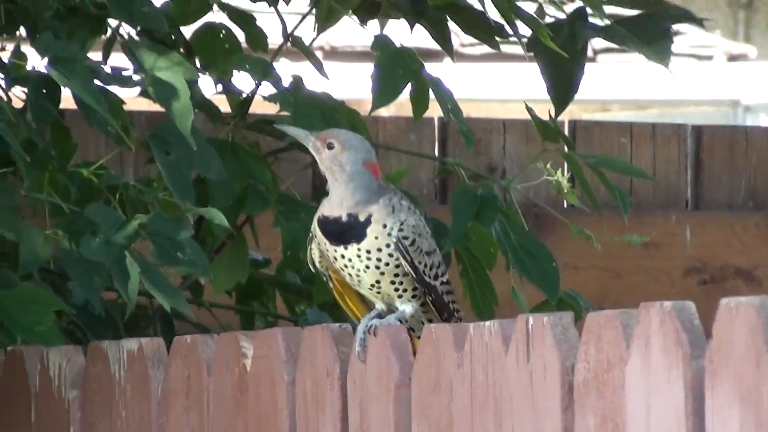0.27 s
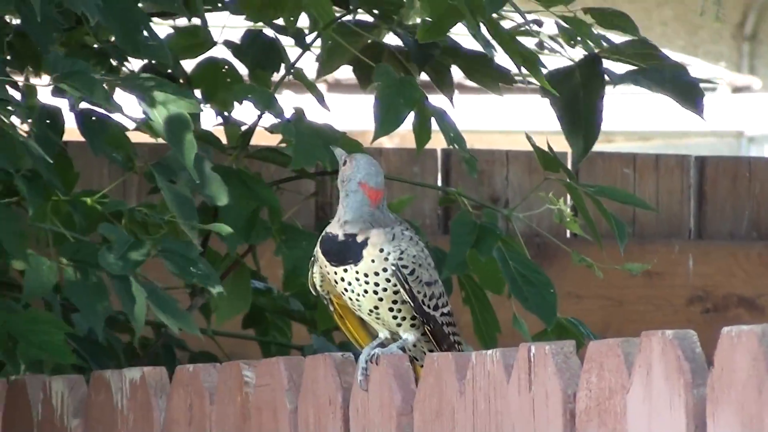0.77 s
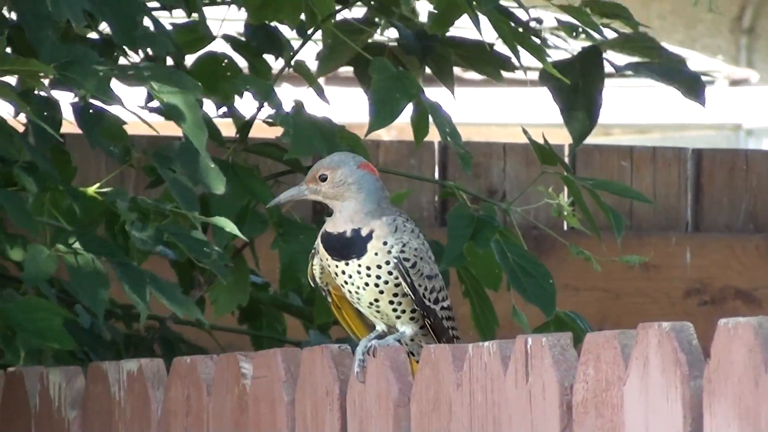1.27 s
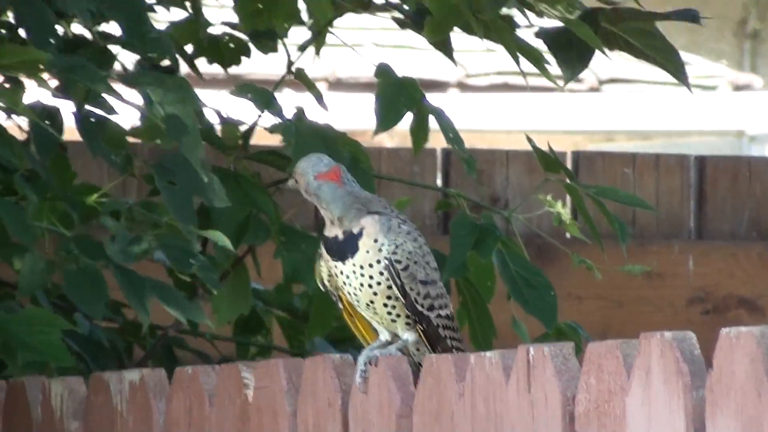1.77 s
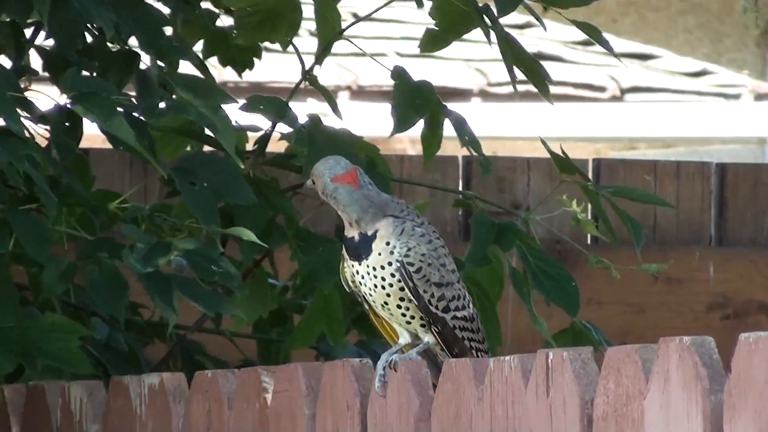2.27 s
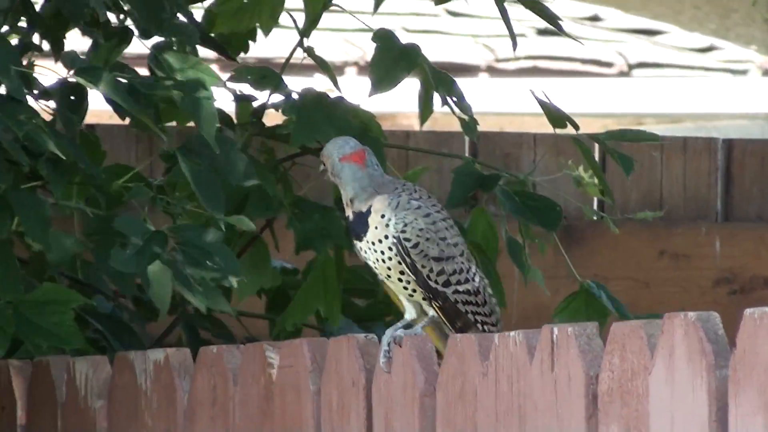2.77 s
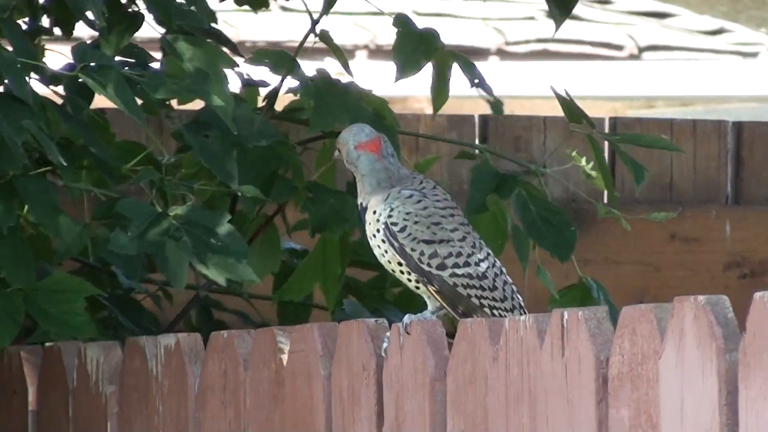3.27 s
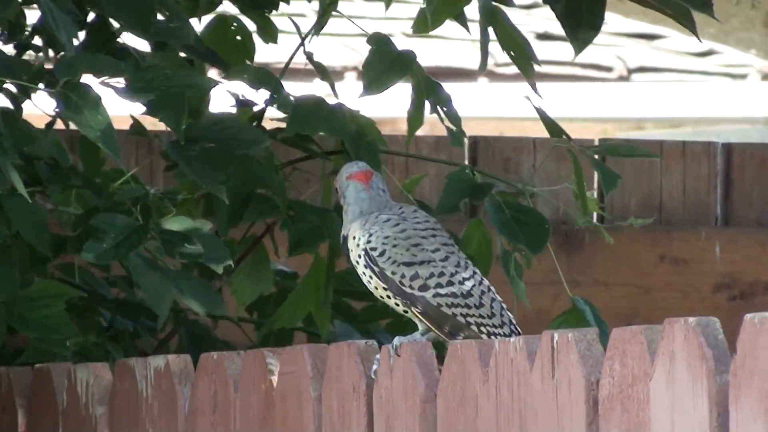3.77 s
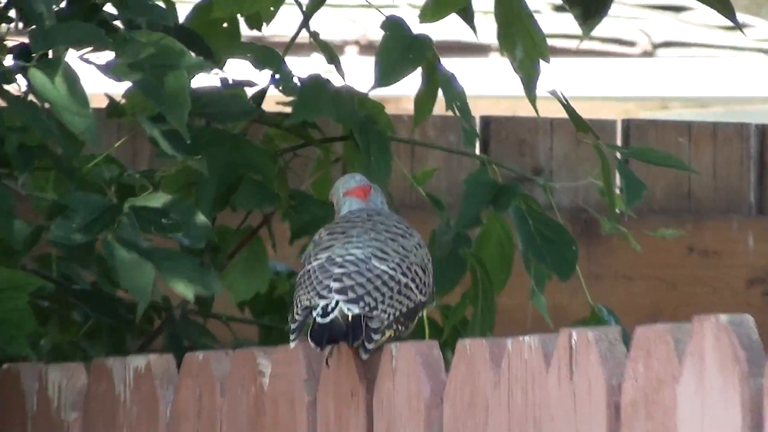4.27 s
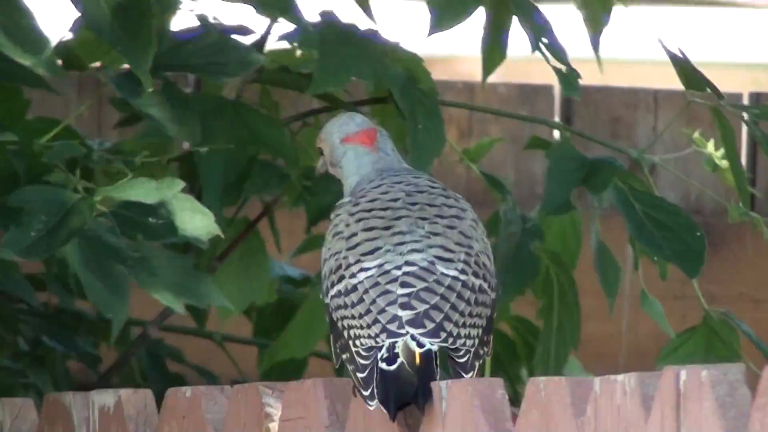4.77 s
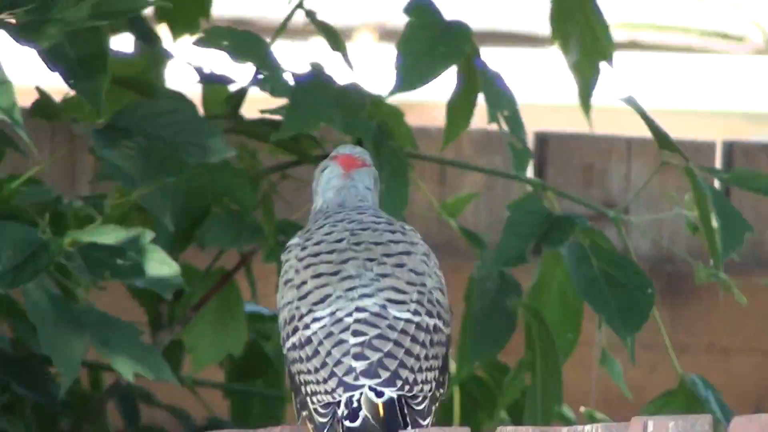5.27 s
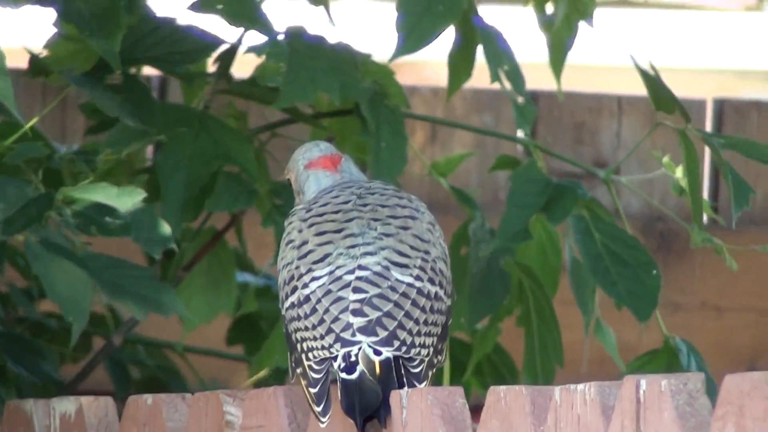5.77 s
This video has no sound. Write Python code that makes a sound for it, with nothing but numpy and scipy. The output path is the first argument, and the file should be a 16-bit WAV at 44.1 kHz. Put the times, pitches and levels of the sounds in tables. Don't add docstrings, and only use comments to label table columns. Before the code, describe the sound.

Two sharp, down-sliding woodpecker cries ring across a yard, between them a hard plastic click, faint chirps, and a distant engine pulling away.

```python
import sys
import numpy as np
from scipy import signal
from scipy.fft import rfft, irfft
from scipy.io import wavfile
from scipy.ndimage import uniform_filter1d, map_coordinates

SR = 44100
rng = np.random.default_rng(int(sys.argv[2]) if len(sys.argv) > 2 else 0)


def wav_record(signal):
    frames = np.transpose(np.atleast_2d(signal))
    bounded = np.clip(frames, -1, 1)
    quanta = np.round(bounded * 32767).astype(np.int16)
    wavfile.write(sys.argv[1], SR, quanta)


def makeup_ratio(level_db):
    decades = np.asarray(level_db, float) / 20
    return 10 ** decades


N = 266187
T = np.arange(N) / SR
# (frequency [Hz], likeness [0 to 1])
ALIKE = [(60, 0.99), (150, 1), (380, 0.897), (950, 0.78), (2380, 0.46), (5980, 0.696), (15000, 0.87)]


def unit(x):
    return x / np.sqrt(np.mean(x ** 2) + 1e-20)


def along(points, hz):
    f, v = np.transpose(points)
    return np.interp(np.log(hz + 1), np.log(f + 1), v)


def wobble(rate, count=N):
    knots = rng.standard_normal(int(count * rate / SR) + 4)
    return map_coordinates(knots, [np.arange(count) * rate / SR])


def glide(u, a, b, c):
    return a * (1 - u) * (1 - 2 * u) + 4 * b * u * (1 - u) + c * u * (2 * u - 1)


def rush(spectrum, alike, patchy_db):
    hz, _, z = signal.stft(rng.standard_normal((2, N)), SR, nperseg=2048)
    field = uniform_filter1d(rng.standard_normal(z.shape[1:]), size=12, axis=0)
    field = uniform_filter1d(field, size=4, axis=1)
    turn = np.arccos(np.clip(along(alike, hz), -1, 1)) / 2
    colour = makeup_ratio(along(spectrum, hz)) * [np.cos(turn), np.sin(turn)]
    z = z * makeup_ratio(patchy_db * unit(field)) * colour[..., None]
    mid, side = signal.istft(z, nperseg=2048)[1][:, :N]
    return unit(np.array([mid + side, mid - side]))


def notes(fall, level_db, factor, stretch):
    # (length [s], start [Hz], middle [Hz], end [Hz], level over the call [dB])
    opening = [
        (.0065, 3030, 3118, 3148, -2),
        (.0165, 2010, 1622, 2232, -3.5),
        (.033, 1670, 1585, 1500, 1.5),
    ]
    lengths = [stretch * row[0] for row in opening]
    rows = []
    for k, (_, a, b, c, db) in enumerate(opening):
        start = fall[0][0] - sum(lengths[k:])
        rows.append((start, factor * a, factor * b, factor * c, level_db + db))
    for (s, hz, db), (_, end, _) in zip(fall, fall[1:] + fall[-1:]):
        rows.append((s, hz, (hz + end) / 2, end, db))
    return rows


def woodpecker(rows, smear):
    # (frequency [Hz], width [Hz], level [dB])
    resonances = [(1884, 4300, -6), (3200, 1700, -1.5), (5080, 2100, -3.5), (6500, 2200, -3.5),
                  (9090, 890, 1.5), (10940, 700, -20.5), (12600, 1500, -20), (14600, 1500, -22)]
    # (fundamental [dB], third partial [dB], higher partials [dB], rasp [dB])
    voicing = [
        (-6.5, -40, -29, -42),
        (-1.5, -7, -14, -18),
        (-30, -25, -22, -27),
        (0, -12, -13, -32.5),
        (-8.5, -15.5, -7.5, -27),
        (-10.5, -12, -17, -19),
        (-15, -14, -15.5, -30),
        (-6, -4, -20.5, -26),
        (-4, -24.5, -29, -40),
    ]
    # (frequency [Hz], level per Hz [dB])
    air = [(1200, -36), (2500, -20), (5000, -9), (7700, 0.5), (9250, -3), (10600, -10), (13000, -13),
           (15500, -18)]

    def throat(hz):
        return np.sqrt(sum(makeup_ratio(2 * db) / (1 + (2 * (hz - f) / w) ** 2) ** 2 for f, w, db in resonances))

    s, a, b, c, level_db = np.transpose(rows)
    t = T[round(s[0] * SR):round(s[-1] * SR)]
    count = len(t)
    i = np.clip(np.searchsorted(s, t, "right") - 1, 0, len(s) - 2)
    colour = np.transpose(voicing)[:, i].astype(float)
    first_db, third_db, high_db, rasp_db = uniform_filter1d(colour, size=90, axis=1)
    pitch = glide((t - s[i]) / np.diff(s)[i], a[i], b[i], c[i])
    phase = 2 * np.pi * np.cumsum(pitch * (1 + 0.005 * wobble(389.0, count=count))) / SR

    voice = np.zeros(count)
    second_db = np.where(i, 0, -14)
    for k, weight_db in enumerate([first_db, second_db, third_db] + [high_db] * 11, 1):
        flutter = (1.9 + min(k, 5) * 0.35) * wobble(230.4, count=count)
        fade = 2.8 * max(k - 6, 0)
        blur = max(k - 2, 0) * smear * wobble(600, count=count)
        strength = throat(k * pitch) * makeup_ratio(weight_db + flutter - fade) * (k * pitch < SR / 2.5)
        voice += strength * np.sin(k * phase + blur)

    puffs = rng.standard_normal(count) * (1 + np.sin(phase))
    air_gain = makeup_ratio(along(air, np.fft.rfftfreq(count, 1 / SR)))
    rasp = unit(irfft(rfft(puffs) * air_gain, count))
    scoop_jump = np.exp(-((t - s[2] - .001) / 0.0084) ** 2)
    rasp_db = uniform_filter1d(rasp_db, size=700) + 11 * scoop_jump

    centres = np.r_[s[0], (s[:-1] + s[1:]) / 2, s[-1]]
    effort = makeup_ratio(np.interp(t, centres, np.r_[level_db[0] - 8, level_db]))
    breaks = 1 - 0.3 * np.exp(-((t[:, None] - s[1:4]) / 0.001) ** 2).sum(axis=1)
    edge = np.clip(np.minimum(t - s[0], s[-1] - t) / 0.00067, 0, 1)
    out = np.zeros(N)
    out[round(s[0] * SR):][:count] = (voice * breaks + makeup_ratio(rasp_db) * rasp) * effort * edge
    return out


def yard(x, wet_db, delay):
    # (frequency [Hz], time to fall 60 dB [s])
    decay = [(800, 0.63), (2000, 0.47), (3100, 0.5), (4500, 0.52), (8000, 0.34), (14000, 0.19)]
    hz, t, z = signal.stft(rng.standard_normal((3, SR)), SR, nperseg=256)
    tail = signal.istft(z * makeup_ratio(-60 * t / along(decay, hz)[:, None]), SR, nperseg=256)[1]
    tail = tail[0] + 0.48 * tail[1:]
    tail *= 1 - np.exp(-np.arange(tail.shape[1]) / SR / delay)
    return makeup_ratio(wet_db) * signal.fftconvolve(x[None], tail / np.linalg.norm(tail[0]), axes=1)[:, :N]


def fences(x, turned, facing_db, walls_db, wet_db):
    # (delay [s], left level [dB], right level [dB])
    walls = [(.0055, -7, -14), (.0085, -20, -12), (0.0135, -12, -10.5), (0.0171, -14, -27),
             (0.0217, -10, -5.5), (0.036, -7, -7.5), (.047, -30, -13), (0.067, -37, -29)]
    dull = signal.sosfilt(signal.butter(1, 4500, fs=SR, output="sos"), x)
    echoes = sum(makeup_ratio([[left], [right]]) * np.roll(dull, round(s * SR)) for s, left, right in walls)
    direct = x + np.clip(turned, 0, 1) * (2 * dull - x)
    return makeup_ratio(facing_db) * direct + makeup_ratio(walls_db) * echoes + yard(x, wet_db=wet_db, delay=0.0044)


def calls():
    # (time [s], pitch [Hz], level [dB])
    falls = [
        [(2.766, 1990, -17), (2.774, 1850, -14.5), (2.803, 1580, -14.5), (2.832, 1391, -15.5),
         (2.858, 1014, -34.5), (2.922, 981, -33.5), (2.94, 940, -47)],
        [(5.73, 2000, -15.5), (5.738, 1845, -19), (5.762, 1601, -14), (5.795, 1457, -20.5),
         (5.826, 1027, -30.5), (5.888, 992, -40.5), (5.93, 894, -40.5)],
    ]
    # (level [dB], pitch factor, length factor)
    opened = [
        (-14.5, .985, 1.03),
        (-17, 1.01, .97),
    ]
    first = woodpecker(notes(falls[0], *opened[0]), smear=.21)
    second = woodpecker(notes(falls[1], *opened[1]), smear=.44)
    first = fences(first, turned=0.12, facing_db=[[-.6], [.6]], walls_db=-1.0, wet_db=-9.5)
    second = fences(second, turned=0.076, facing_db=[[-.8], [.8]], walls_db=1.5, wet_db=-7)
    return first + second


def feathers():
    # (time [s], half length [s], level [dB])
    rustle = [
        (4.049, .038, -57.5),
        (4.154, .018, -49.5),
        (4.208, 0.03, -53.5),
        (4.668, 0.013, -53.5),
    ]
    centre_hz = 8900
    edges = [0.61 * centre_hz, 1.155 * centre_hz]
    band = signal.butter(2, edges, "bandpass", fs=SR, output="sos")
    out = np.zeros(N)
    for s, half, db in rustle:
        grain = rng.standard_normal(N) * makeup_ratio(3.6 * wobble(300))
        out += makeup_ratio(db) * np.exp(-((T - s) / half) ** 2) * unit(signal.sosfilt(band, grain))
    return out


def chirps(strokes, burr, overtone_db, lean):
    out = np.zeros(N)
    for s, length, start, end, db in strokes:
        u = np.arange(round(length * SR)) / (length * SR)
        pitch = (start + (end - start) * u) * (1 + burr * wobble(905, count=len(u)))
        phase = 2 * np.pi * np.cumsum(pitch) / SR
        swell = np.sin(np.pi * u ** lean) ** 0.4 * makeup_ratio(db + 24.0 * burr * wobble(200, count=len(u)))
        out[round(s * SR):][:len(u)] += swell * (np.sin(phase) + makeup_ratio(overtone_db) * np.sin(2 * phase))
    return out


def tweets():
    # (time [s], length [s], foot [Hz], top [Hz], level [dB])
    arches = [
        (0.547, 0.053, 5200, 7050, -42),
        (0.684, 0.027, 5550, 6110, -42.5),
        (5.017, .056, 5200, 7070, -44),
        (5.139, .036, 2940, 6020, -47.5),
    ]
    up_s, down_s, lands_hz, flick_db = .0085, .006, 3200, -0.5
    strokes = []
    for s, length, foot, top, db in arches:
        strokes.append((s, up_s, foot, top * .96, db + flick_db))
        strokes.append((s + up_s, length - up_s - down_s, top * 0.94, top, db))
        strokes.append((s + length - down_s, down_s, top, lands_hz, db + flick_db))
    return strokes


def small_birds():
    # (time [s], length [s], start [Hz], end [Hz], level [dB])
    chips = [(0.476, 0.0098, 6500, 7150, -44.5), (.623, 0.0069, 7200, 7200, -40.5),
             (.658, .008, 5260, 5350, -48), (0.686, 0.022, 4150, 4280, -51),
             (0.679, 0.0065, 5840, 5330, -47), (.743, 0.0052, 5000, 3000, -51),
             (5.127, .0045, 5360, 6060, -48), (5.16, .013, 4420, 4600, -46.5)]
    # (time [s], length [s], start [Hz], end [Hz], level [dB])
    hoarse = [
        (.803, 0.029, 2945, 3020, -43.5),
        (.828, .044, 3300, 2740, -49),
    ]
    # (time [s], length [s], start [Hz], end [Hz], level [dB])
    distant = [(.24, 0.036, 4150, 3480, -57), (.78, 0.032, 4700, 4000, -55.5),
               (1.27, 0.065, 5200, 5400, -56.5), (1.61, 0.094, 4320, 3100, -53.5),
               (1.84, .06, 4800, 2800, -54), (2.62, 0.11, 4620, 3680, -55),
               (3.35, 0.064, 4570, 3220, -52.5), (4.03, 0.074, 4320, 3200, -49),
               (4.93, .038, 4000, 3490, -55), (5.27, .04, 5570, 5400, -57), (5.29, 0.069, 4660, 3290, -51)]
    near = chirps(tweets() + chips, burr=0.023, overtone_db=-31, lean=2.2)
    near += chirps(hoarse, burr=0.0543, overtone_db=-23, lean=.8)
    far = chirps(distant, burr=0.074, overtone_db=-23.5, lean=0.89)
    near_yard = yard(near, wet_db=-9.0, delay=0.0049)
    return near + near_yard + makeup_ratio(-0.5) * far + yard(far, wet_db=-0.5, delay=0.0027)


def snap():
    # (time [s], peak [dB])
    snaps = [
        (4.5613, -6.5),
    ]
    # (frequency [Hz], level [dB], time to fall 60 dB [s])
    shell = [(1135, -7, 0.02), (1860, -10, 0.028), (2500, -14, 0.028), (2780, -15, 0.024), (3320, 8, 0.005),
             (4230, 1.5, 0.011), (4700, -1, 0.0116), (5450, -6, 0.011), (6285, -4.5, 0.011),
             (6860, -4, 0.0073), (7050, -21, 0.0118), (7110, -8.5, 0.01), (9300, -11, 0.0088),
             (630, -12.5, 0.011)]
    band = signal.butter(4, [350, 9700], "bandpass", fs=SR, output="sos")
    out, t = np.zeros(N), np.arange(SR // 10) / SR
    for s, db in snaps:
        ring = sum(makeup_ratio(level - 60 * t / t60) * np.sin(2 * np.pi * hz * t) for hz, level, t60 in shell)
        crack = .5 * makeup_ratio(-60 * t / .008) * np.diff(rng.standard_normal(len(t) + 1))
        ring = signal.sosfilt(band, (ring + crack) * (1 - np.exp(-t / 0.00009)))
        out[round(s * SR):][:len(t)] += makeup_ratio(db) * ring / abs(ring).max()
    return out


def ticks():
    # (time [s], peak [dB], centre [Hz])
    taps = [(1.593, -34, 6500), (1.8222, -47, 5230), (3.6865, -38, 5770), (3.7199, -39, 6710),
            (3.9702, -40, 5900), (4.0033, -41, 4000), (4.0154, -41, 8500), (4.155, -38, 3760),
            (4.153, -42, 7090), (4.1808, -27, 7807), (4.6257, -42, 10600), (4.6507, -43, 7060),
            (4.7378, -39, 4170), (4.8745, -42, 7350)]
    # (time [s], peak [dB], centre [Hz], time to fall 60 dB [s])
    knocks = [
        (0.059, -30, 1190, 0.028),
        (.067, -39, 3460, 0.0098),
        (0.074, -36.5, 1250, 0.0187),
        (.075, -35.5, 3730, 0.0098),
        (0.077, -36, 6860, 0.017),
    ]
    out, t = np.zeros(N), np.arange(SR // 20) / SR
    tap_t60 = 0.012
    for s, db, hz, t60 in [(*tap, tap_t60) for tap in taps] + knocks:
        band = signal.butter(3, [0.78 * hz, min(1.33 * hz, 16000)], "bandpass", fs=SR, output="sos")
        burst = signal.sosfilt(band, rng.standard_normal(len(t)) * makeup_ratio(-60 * t / t60))
        out[round(s * SR):][:len(t)] += makeup_ratio(db) * burst / abs(burst).max()
    return out


def lens():
    # (frequency [Hz], level per Hz [dB])
    gears = [(3000, -22), (4400, -7.5), (5000, -11), (5600, -4), (6500, -10), (8200, -4), (9500, -23),
             (13000, -29)]
    # (middle [s], half length [s], whine [dB])
    zooms = [
        (3.38, .1, -70),
        (4.053, .15, -71),
        (4.4, 0.16, -62.5),
        (4.725, .07, -66),
    ]
    # (time [s], level [dB], time to fall 60 dB [s])
    focus = [
        (2.52, -67.5, 1.4),
        (2.6, -60, 0.56),
        (3.22, -76, 1.5),
        (3.4, -62.5, 0.41),
        (4.219, -76, 1.5),
    ]
    # (frequency [Hz], level [dB])
    barrel = [(4430, -4), (5860, 1), (7052, 8), (10170, -13)]

    def tone(hz, drift):
        return np.sin(2 * np.pi * np.cumsum(hz * (1 + drift * wobble(30))) / SR)

    zoom = makeup_ratio(4.8 * wobble(23)) * tone(4375, drift=0.0044)
    zoom = zoom + makeup_ratio(3.5) * rush(gears, [(5000, 0.82)], patchy_db=-0.5)
    runs = makeup_ratio(-81) + sum(makeup_ratio(db) * np.exp(-((T - s) / half) ** 4) for s, half, db in zooms)
    steps = np.zeros(N)
    for s, db, t60 in focus:
        steps += makeup_ratio(db - 60 * (T - s).clip(0) / t60) * np.clip((T - s) / .006, 0, 1)
    ring = sum(makeup_ratio(db + 3.6 * wobble(18)) * tone(hz, drift=0.00314) for hz, db in barrel)
    drive = makeup_ratio(-64.5 + 1.3 * wobble(25)) * tone(2519, drift=0.00504)
    return runs * zoom + steps * ring + drive


def engine():
    # (multiple, level [dB], loudest at [s], spread [s])
    exhaust = [(4, -8, 3.1, .4), (5, -.7, 3.28, .68), (6, -10, 3.3, .4), (8, -9, 3.7, .4), (7, -1, 3.8, .4),
               (9, -1, 3.9, .42), (10, -8, 3.4, .25), (11, -2, 3.55, .38), (12, -3, 3.7, .45),
               (13, -5, 3.65, .25), (14, -4, 3.68, .25), (15, -11, 3.6, .3), (20, -9, 3.63, .12)]
    # (frequency [Hz], level per Hz [dB])
    roar_colour = [(120, -120), (180, -8), (300, 0), (420, -10), (600, -120)]
    base_hz = 24.9 + 3.45 * np.tanh((T - 3.3) / .8)
    phase = 2 * np.pi * np.cumsum(base_hz * (1 + .004 * wobble(8))) / SR
    out = makeup_ratio(-58) * np.exp(-((T - 3.55) / .45) ** 2) * rush(roar_colour, ALIKE, patchy_db=1.5)
    for k, db, s, spread in exhaust:
        level = makeup_ratio(db - 47.5 + 1.7 * wobble(5.85)) * np.exp(-((T - s) / spread) ** 4)
        out += level * np.sin(k * phase + k * k)
    return out


def background():
    # (frequency [Hz], level per Hz [dB])
    traffic = [(15, -62.5), (25, -48.5), (48, -17), (69, -2), (205, -5), (381, -6.5), (447, -10), (738, -7),
               (816, -7.5), (1400, -18), (2360, -27), (2560, -26), (3000, -57), (3900, -56), (6600, -120)]
    # (frequency [Hz], level per Hz [dB])
    hiss = [(880, -6), (1500, -4), (2340, -9), (2530, -10), (2630, -7.5), (5240, -12), (6770, -12),
            (15800, -17.5)]
    # (frequency [Hz], level [dB])
    pump = (65, -59)
    tyres_db = 2.5 * np.exp(-((T - 3.85) / 1) ** 2)
    hum_db = -48 + tyres_db + 0.13 * wobble(3.38) + [[-.3], [.3]]
    hum = makeup_ratio(hum_db) * rush(traffic, ALIKE, patchy_db=0.94)
    hum = signal.sosfilt(signal.butter(2, 40, "highpass", fs=SR, output="sos"), hum)
    pump_phase = 2 * np.pi * np.cumsum(pump[0] * (1 + .07 * wobble(15))) / SR
    drone = makeup_ratio(pump[1] + 3 * wobble(8)) * np.sin(pump_phase)
    return hum + drone + makeup_ratio(-52.5) * rush(hiss, ALIKE, patchy_db=1.58)


def scene():
    bird = calls() + feathers()
    camera = snap() + ticks() + lens()
    return bird + small_birds() + camera + engine() + background()


def band_limit(x):
    return signal.sosfilt(signal.butter(12, 16440, fs=SR, output="sos"), x)


def record(dry):
    mid, side = (dry[0] + dry[1]) / 2, (dry[0] - dry[1]) / 2
    side = signal.sosfilt(signal.butter(1, 9000, fs=SR, output="sos"), side)
    top = np.fft.rfftfreq(N, 1 / SR) < 15900
    wet = irfft(rfft([mid + side, mid - side]) * top, N)
    fade_in = np.clip((T - .04) / 0.0089, 0, 1) ** 2
    return band_limit(wet * fade_in)


dry = scene()
out = record(dry)
wav_record(out)
```